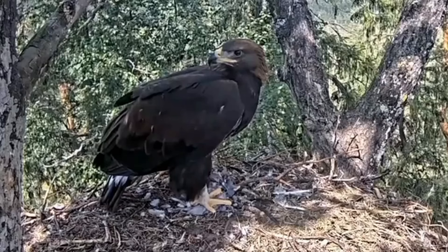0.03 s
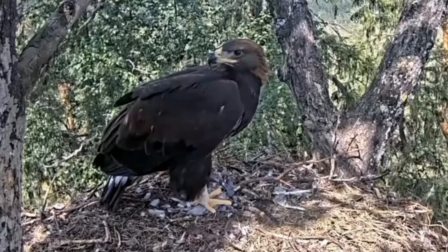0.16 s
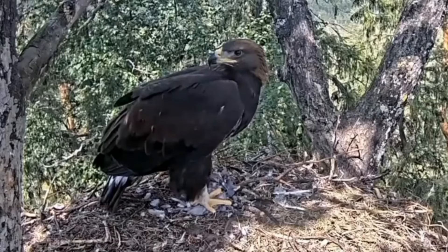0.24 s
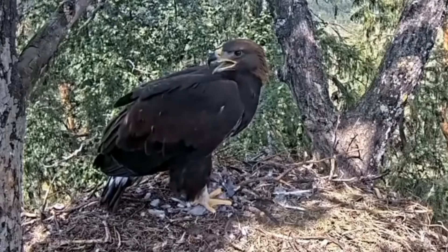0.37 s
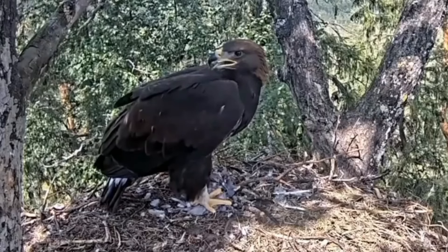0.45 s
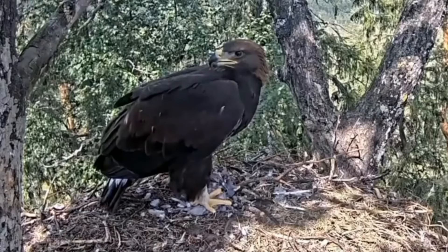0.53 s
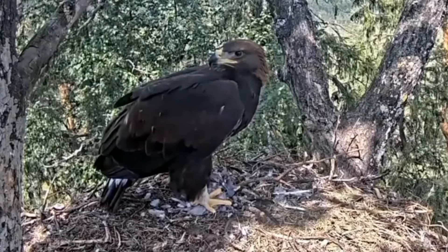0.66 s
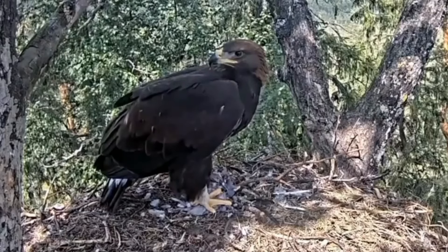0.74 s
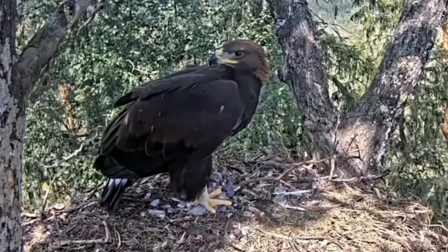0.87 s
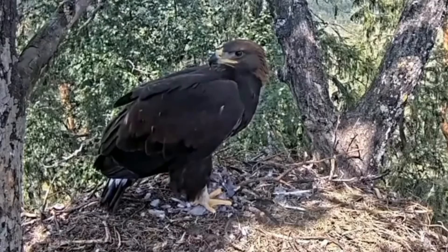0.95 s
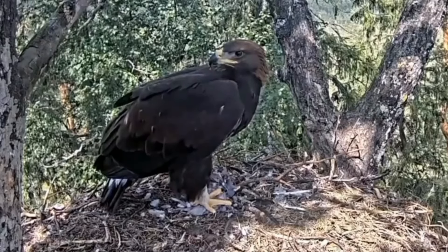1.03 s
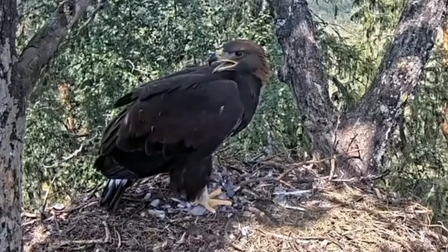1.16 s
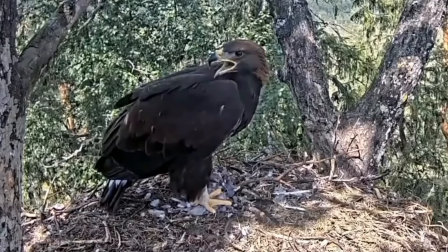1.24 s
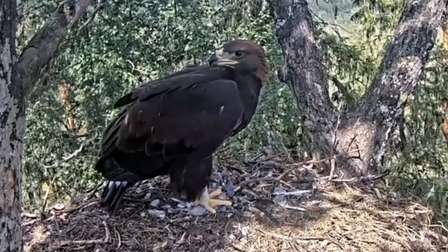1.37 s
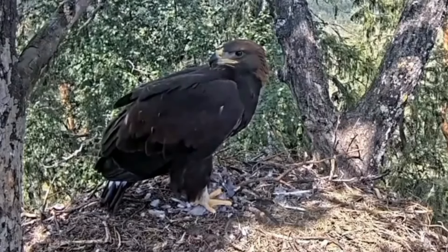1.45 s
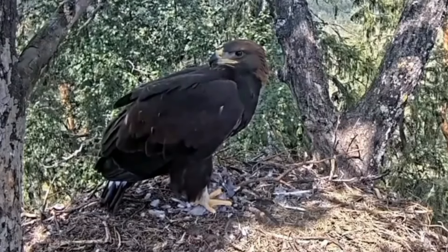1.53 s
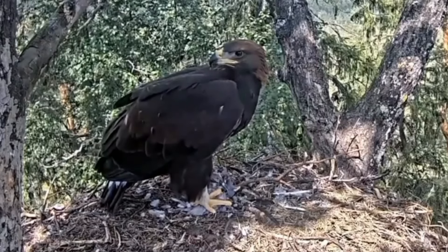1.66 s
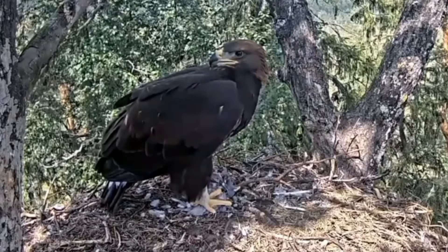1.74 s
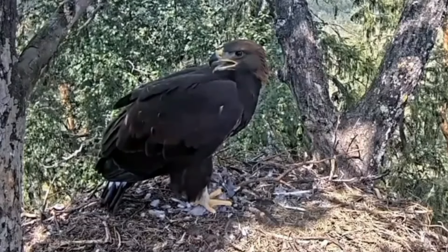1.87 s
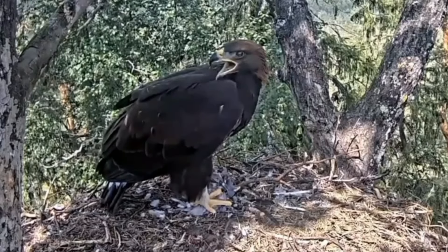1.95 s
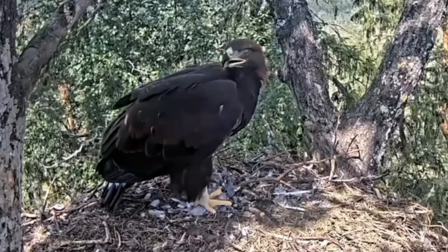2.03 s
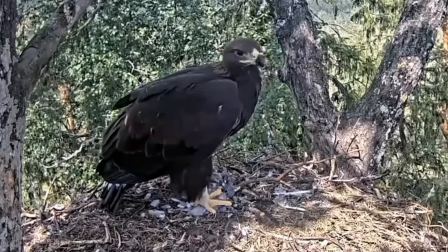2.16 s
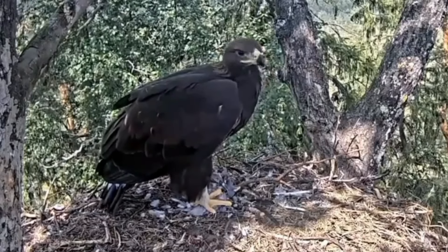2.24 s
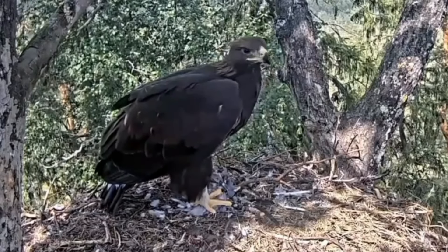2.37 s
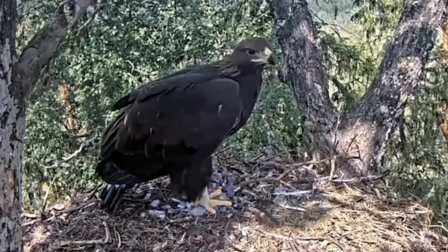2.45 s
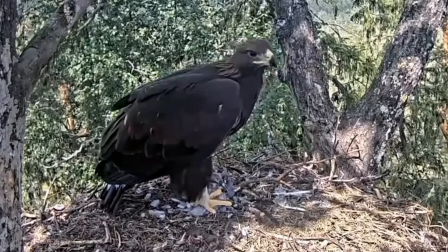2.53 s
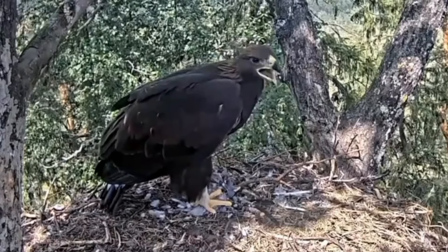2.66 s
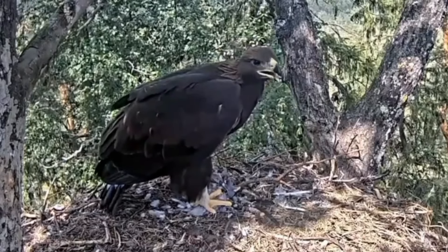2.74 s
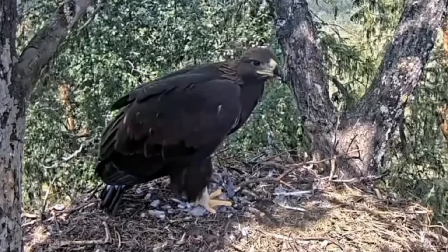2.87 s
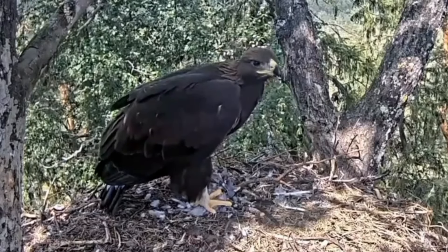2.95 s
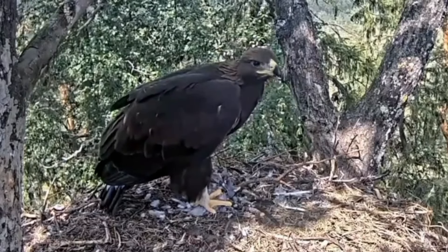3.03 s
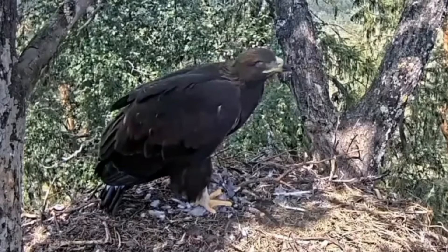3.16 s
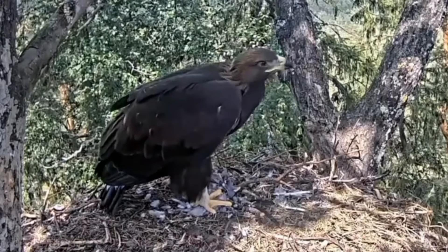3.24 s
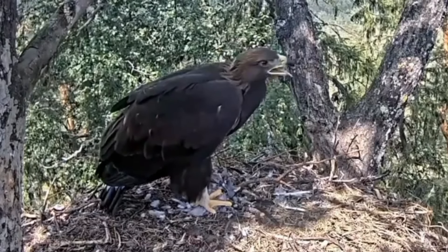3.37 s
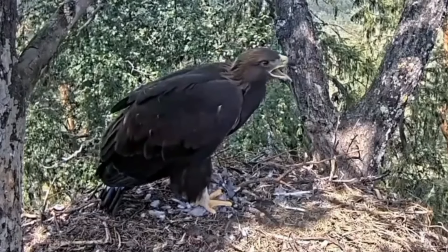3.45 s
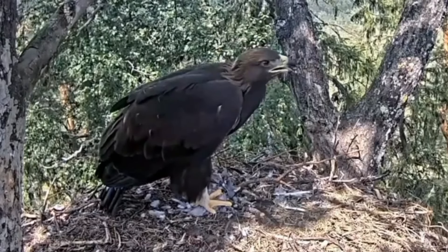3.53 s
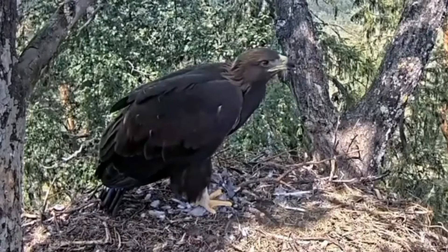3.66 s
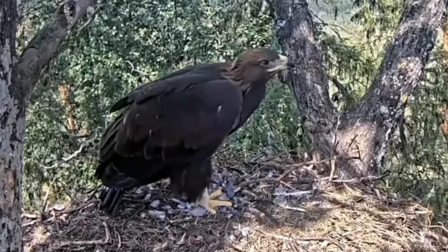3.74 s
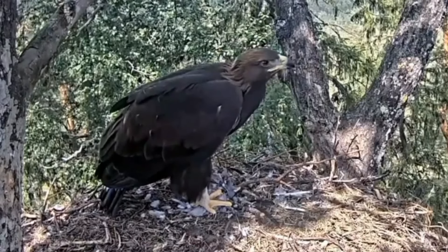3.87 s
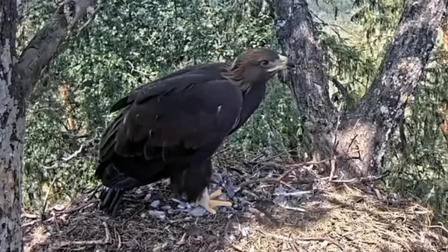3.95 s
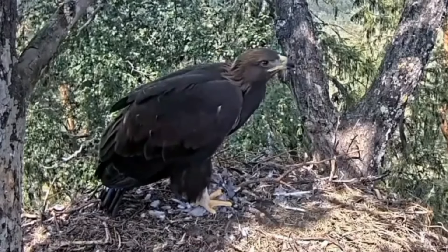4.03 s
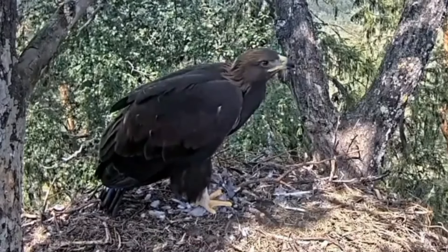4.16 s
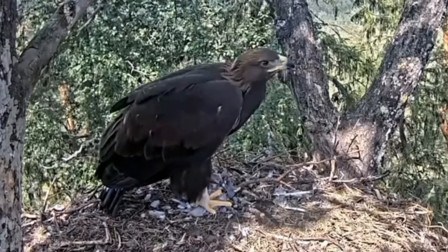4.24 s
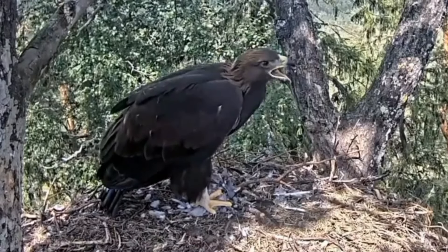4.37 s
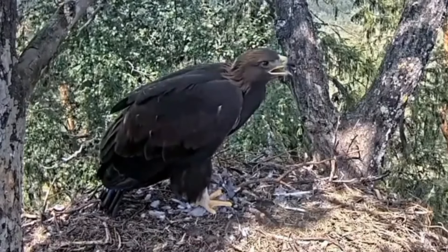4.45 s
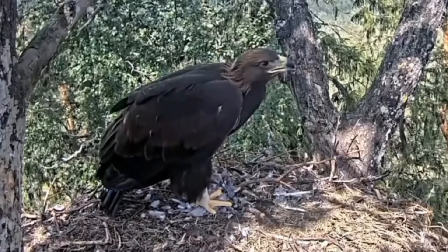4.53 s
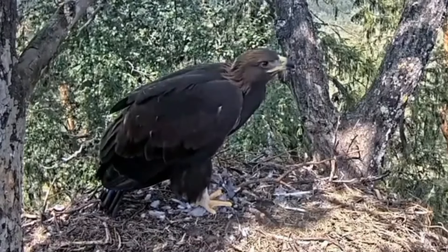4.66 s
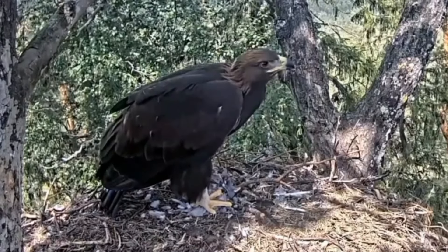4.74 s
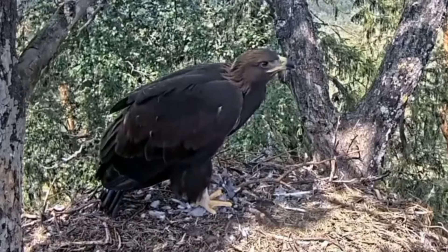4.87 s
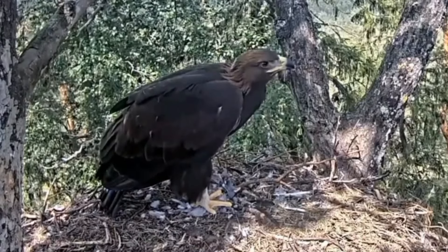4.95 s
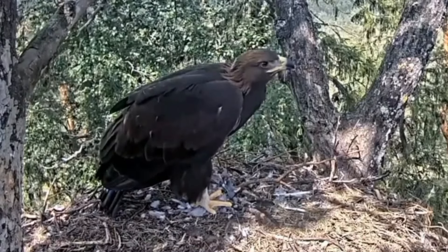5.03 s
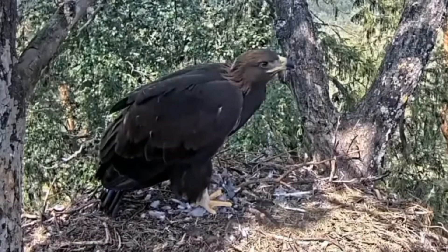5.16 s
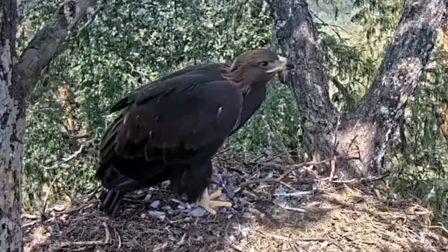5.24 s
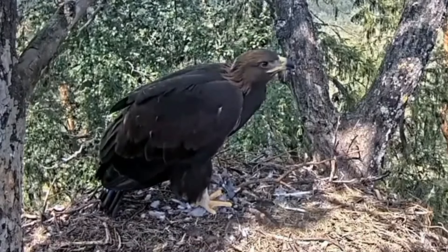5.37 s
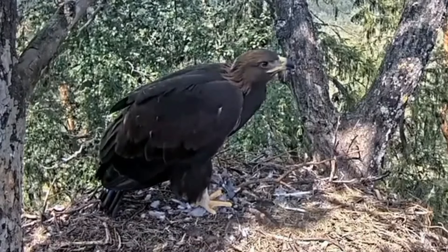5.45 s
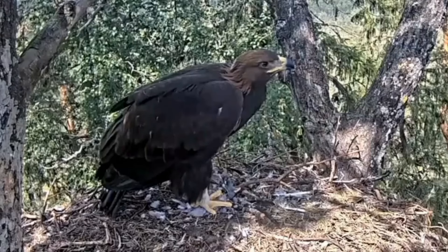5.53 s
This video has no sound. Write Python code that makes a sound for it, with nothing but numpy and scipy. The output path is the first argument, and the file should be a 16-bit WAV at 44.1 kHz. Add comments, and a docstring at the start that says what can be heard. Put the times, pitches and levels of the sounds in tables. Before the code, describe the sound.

In a quiet wood, the fading tail of an earlier call opens the scene, with a faint distant peep. Then five sharp, yelping eagle calls follow at fairly regular gaps, the later ones louder. Each flips from a high clear note to a falling lower one and rings off the trunks. The microphone is fairly near; the background is a very soft hush.

```python
"""Eagle yelping in a wood

A large eagle yelps five times. Each call is a thin rising whistle, a click as the voice catches, a high
clear note and a falling low note from the other side of the syrinx, all built from partials or short chirps.
Sparse decaying echoes stand for the trunks and draw each call into a long tail; a small bird peeps far off.
Under it lies a soft wash of air and leaves, made of shaped noise."""
import sys
import numpy as np
from scipy import signal
from scipy.io import wavfile
from scipy.ndimage import uniform_filter1d

SR = 44100
rng = np.random.default_rng(int(sys.argv[2]) if len(sys.argv) > 2 else 0)


def wrap_up_sound(samples):
    """Save the sound to the file named by the first command line argument, as 16-bit audio."""
    columns = np.atleast_2d(samples).T
    # keep every value between -1 and 1, then stretch to whole-number steps
    tamed = np.clip(columns, -1, 1)
    steps = np.round(tamed * 32767).astype(np.int16)
    wavfile.write(sys.argv[1], SR, steps)


def voltage_ratio(level):
    """Linear amplitude factor for a level in decibels (scalar or array-like)."""
    return 10 ** (np.asarray(level, float) / 20)


N = 246959  # samples, 5.6 s
LEAD = SR  # one second is played ahead so that an earlier tail carries in
STEP_S = .001  # spacing of the points on pitch and level curves


def evened(x):
    """Scales a signal to rms 1."""
    return x / np.sqrt(np.mean(x ** 2) + 1e-20)


def add(mix, s, sound):
    """Mixes a sound in at s seconds, counted from the end of the lead."""
    part = mix[LEAD + round(s * SR):][:len(sound)]
    part += sound[:len(part)]


def wobble(size, hz):
    """Smooth chance of rms 1 that changes about hz times a second."""
    settle = 500  # samples the filter needs to get going
    b, a = signal.butter(3, hz, fs=SR)
    return evened(signal.lfilter(b, a, rng.standard_normal(size + settle))[settle:])


def air():
    """Leaves, far wind, a faint low hum and hiss: random short spectra with faint drifting patches."""
    # colour of the air: f/Hz, relative level per Hz/dB
    colour = [(8, -0.5), (20, -5), (32, -17.5), (75, -20.5), (87, -15.5), (100, -21), (350, -22),
              (900, -30.5), (1400, -31.5), (1520, -42), (3600, -42), (4400, -37.5), (4650, -38),
              (4850, -44.5), (7000, -42), (9500, -47), (15600, -50)]
    level_db, patch_db = -59, 0.59
    frames, hz = N // 1024 + 5, np.fft.rfftfreq(4096, 1 / SR)
    real, imaginary, patches = rng.standard_normal((frames, 2049, 3)).T
    patches = uniform_filter1d(patches, size=50, axis=0)  # broad in frequency
    patches = evened(uniform_filter1d(patches, size=5, axis=1))  # slow in time
    f, db = np.transpose(colour)
    shape_db = np.interp(np.log(hz + 1), np.log(f + 1), db)[:, None]
    spectra = (real + 1j * imaginary) * voltage_ratio(shape_db + patch_db * patches)
    noise = signal.istft(spectra, nperseg=4096, noverlap=3072)[1][:N]
    return voltage_ratio(level_db) * evened(noise)


def note(rows, partials, jitter, flutter_db, breath_db, overtone_db=0, treble_db=0, effort=0):
    """A vibrating membrane: partials on a pitch curve, slightly unsteady, with air noise around each partial."""
    # the throat passes the top partials unevenly, with an upper resonance: f/Hz, gain/dB
    throat = [(5900, 0), (6500, -5), (7300, 0.5), (8200, -1), (8800, -16.5), (9400, -6), (9800, -0.5)]
    s, hz, level_db = np.transpose(rows)
    t = np.arange(s[0], s[-1], 1 / SR)
    pitch = uniform_filter1d(np.interp(t, s, hz), size=90)
    pitch = pitch * (1 + jitter * wobble(len(t), 360))
    angle = 2 * np.pi * np.cumsum(pitch) / SR
    level_db = uniform_filter1d(np.interp(t, s, level_db), size=60)
    level_db = level_db + flutter_db * wobble(len(t), 200)
    # overtones gain or lose on the fundamental as the note swells
    bright_db = overtone_db + effort * (level_db - level_db.max())
    breath = voltage_ratio(breath_db) * wobble(len(t), 1200)
    tone = 0
    for k, db in partials:
        throat_db = np.interp(k * pitch, *np.transpose(throat)) + treble_db * (k > 3)
        # the higher a partial, the more it comes and goes as the beak moves
        fading_db = 1.1 * max(k - 1, 0) * wobble(len(t), 45)
        gain = voltage_ratio(db + bright_db * (k > 1) + throat_db + fading_db) * (1 + k * breath)
        tone = tone + gain * np.cos(k * angle + 2 * np.pi * rng.random())
    return s[0], np.sqrt(2) * voltage_ratio(level_db) * tone * signal.windows.tukey(len(t), .05)


def far_bird():
    """A small bird far off: two gliding peeps, each a single breathy partial."""
    # points along each peep: t/s, f/Hz (sung at 0.99 of it), level/dB
    peeps = [
        [(0, 6750, -84), (.07, 6850, -76), (.12, 6800, -78), (.18, 6950, -81), (.27, 6900, -89)],
        [(4.18, 6580, -86), (4.215, 6730, -78.5), (4.24, 6600, -83.5), (4.265, 6400, -88)],
    ]
    bird = np.zeros(LEAD + N)
    for rows in peeps:
        add(bird, *note(rows, [(0.99, 0.0077)], jitter=.004, flutter_db=-1.5, breath_db=-10.5))
    return bird


def whistle(start, length, start_hz, end_hz, db):
    """Building pressure drives the pitch steadily up; the level swells to a peak and eases off."""
    peak, start_db, end_db = .6, -15.5, -5.5  # peak as a share of the length
    u = np.arange(0, length, STEP_S) / length
    level_db = np.interp(u, [0, peak, 1], [start_db, 0, end_db])
    pitch = end_hz - (end_hz - start_hz) * (1 - u)
    return np.transpose([start + u * length, pitch, db + level_db])


def catch(s, chirp_db, delay, pop_db):
    """A few falling cycles as the whistle shuts off, then a dull pop that rises to pitch as the throat opens."""
    chirp_hz, pop_hz = 4600, 2100  # where the chirp starts, where the pop settles
    t = np.arange(0, .016, 1 / SR)
    chirp_envelope = (t / 0.00128 * np.exp(1 - t / 0.001801)) ** 2
    chirp = np.sin(2 * np.pi * chirp_hz * (t - 12 * t ** 2)) * chirp_envelope
    u = np.maximum(t - delay, 0)
    bent_time = u - .0005 * (1 - np.exp(-u / 0.00016))
    pop_envelope = np.exp(-u / 0.00041) + 0.34 * np.exp(-u / .003)
    pop = -np.sin(2 * np.pi * pop_hz * bent_time) * pop_envelope
    return s, voltage_ratio(chirp_db) * chirp + voltage_ratio(pop_db) * pop


def high_note(start, hz, db, swell_db, sag_hz, takeover):
    """High side of the syrinx: starts sharp and soft, settles, swells, sags as pressure runs out, is cut off."""
    sharp_start, settle_s = .18, .0055  # starts sharp by this share of the pitch
    onset_db, onset_s, cut_db, cut_s = -20.5, .005, -27, 0.0018
    overlap_s = 0.0044  # sounds on past the takeover
    sag_bend, droop_bend, droop_db_per_hz = 2.1, 4.1, 0.0529  # the level droops along with the pitch
    length = takeover + overlap_s - start
    t = np.arange(0, length, STEP_S)
    u = t / length
    pitch = hz * (1 + sharp_start * np.exp(-(t / settle_s) ** 1.5)) - sag_hz * u ** sag_bend
    ends_db = onset_db * np.exp(-t / onset_s) + cut_db * np.exp((t - length) / cut_s)
    droop_db = droop_db_per_hz * sag_hz * u ** droop_bend
    return np.transpose([start + t, pitch, db + ends_db + swell_db * (u - 1) - droop_db])


def rasp(sung):
    """Air rushing past the upper throat resonance: patchy band noise that follows the voice's loudness."""
    centre_hz, half_width_hz, level_db, patch_db = 7377, 650, -47.5, 2.3
    edges = [centre_hz - half_width_hz, centre_hz + half_width_hz]
    band = signal.butter(2, edges, "band", fs=SR, output="sos")
    loudness = np.sqrt(abs(uniform_filter1d(sung ** 2, size=200)))
    noise = evened(signal.sosfilt(band, rng.standard_normal(len(sung))))
    return voltage_ratio(level_db + patch_db * wobble(len(sung), 40)) * loudness * noise


def low_note(high_start, takeover, length, hz, db, murmur_db):
    """Low side of the syrinx: a murmur under the high note, a sudden opening, then falling pitch and level."""
    murmur_delay_s, peak_s, width_s, floor_db = .005, 0.006, 0.0028, -59.5  # a brief flare over a floor
    flat_hz, lift_s = 41.12, .015  # the murmur lies flat and lifts towards the takeover
    drop_hz, drop_s, fall_hz, fall_s = 129, .004, 302.4, 0.041  # a quick drop, then a fall that slows
    leak_db_per_s, knee_db, knee_s = 698.5, -9, 0.0028  # air leaks over ahead of the takeover
    open_db, open_s = -11, .003  # then the voice opens fully
    fade_db, fade_bend, close_db, close_s = -24.5, 1.4, -16, .004
    t = np.arange(high_start + murmur_delay_s - takeover, length, STEP_S)  # 0 at the takeover
    before, after, age = np.minimum(t, 0), np.maximum(t, 0), t - t[0]
    pitch = hz - flat_hz * (1 - np.exp(before / lift_s))
    pitch = pitch - drop_hz * (1 - np.exp(-after / drop_s)) - fall_hz * (1 - np.exp(-after / fall_s))
    flare = voltage_ratio(murmur_db) * np.exp(-((age - peak_s) / width_s) ** 2)
    murmur = flare + voltage_ratio(floor_db) * (t < 0)
    leak_db = leak_db_per_s * before + knee_db * (1 - np.exp(before / knee_s))
    opening_db = open_db * np.exp(-(after / open_s) ** 2)
    ending_db = fade_db * (after / length) ** fade_bend + close_db * np.exp((t - length) / close_s)
    level_db = 20 * np.log10(voltage_ratio(db + leak_db + opening_db + ending_db) + murmur)
    return np.transpose([takeover + t, pitch, level_db])


def eagle():
    """Both sides of the syrinx share one airflow; the first call also sounds ahead of time for its tail."""
    # thin whistles as pressure builds, a lower strand then an upper: t/s, length/s, start f/Hz, end f/Hz, level/dB
    whistle_rows = [(.232, 0.0957, 3550, 4600, -66.5), (0.245, .115, 4795, 6254, -73.5),
                    (.958, .105, 3500, 4794, -65), (1.038, .06, 4950, 5750, -63),
                    (1.705, 0.067, 3916, 4989, -61), (1.754, .063, 5050, 5500, -65),
                    (2.46, .11, 3550, 4905, -60.5), (2.555, .05, 4906, 5440, -62),
                    (3.395, .11, 3520, 4900, -64.5), (3.485, .048, 4900, 5440, -66)]
    # the voice catches: t/s, chirp level/dB (its envelope crests 6 dB above), pop delay/s, pop level/dB
    catch_rows = [(0.367, -40.5, 0.00528, -41.5), (1.1003, -41, 0.00518, -40.5),
                  (1.8185, -40.5, .0045, -34.5), (2.6055, -46.5, .0038, -36), (3.5356, -48, 0.00317, -36)]
    # high side of the syrinx: t/s, held f/Hz, level/dB, swell/dB, sag/Hz
    high_rows = [(.378, 1954, -21, 7, 94.8), (1.112, 1957, -22.5, 4.5, 75.04),
                 (1.8297, 1922, -15, 9.5, 148.4), (2.6176, 1946, -15.5, 10, 86.52),
                 (3.5457, 1955, -16, 9.5, 75)]
    # low side of the syrinx: takeover t/s, length after/s, f/Hz, level/dB, murmur flare level/dB
    low_rows = [(.444, 0.0501, 1426, -25.5, -45), (1.176, 0.052, 1435, -24, -56),
                (1.9, 0.0461, 1411, -19, -41.5), (2.673, 0.0639, 1481, -16.5, -39.5),
                (3.597, 0.0611, 1493, -16, -55)]
    # partials of each voice: multiple of pitch, level/dB
    whistle_partials = [(1, 1.5), (2, -10.5)]
    high_partials = [(.5, -35), (1, 0.5), (2, -20.5), (3, -37), (4, -46), (5, -43), (6, -50)]
    low_partials = [(1, 2.5), (2, -16), (3, -26), (4, -48), (5, -47.5), (6, -47.5), (7, -46)]
    # the head turns between calls: high overtones/dB, low overtones/dB, extra on partials above the third/dB
    head_turns = [(1, 4, -3), (1.5, 4, -7), (-3.5, -1, -1), (-3.5, -3.5, -5), (-4, -4, -3)]
    earlier_s, earlier_db = 0.82, 0.53  # how long ahead the extra call sounds, how loud against the first
    voice, high, low = np.zeros((3, LEAD + N))
    for row in whistle_rows:
        add(voice, *note(whistle(*row), whistle_partials, jitter=.013, flutter_db=4.0, breath_db=-12))
    for row in catch_rows:
        add(voice, *catch(*row))
    for high_row, low_row, (high_db, low_db, top_db) in zip(high_rows, low_rows, head_turns):
        high_curve = high_note(*high_row, low_row[0])
        add(high, *note(high_curve, high_partials, jitter=.002, flutter_db=0.58, breath_db=-34,
                        overtone_db=high_db, treble_db=top_db, effort=-0.45))
        low_curve = low_note(high_row[0], *low_row)
        add(low, *note(low_curve, low_partials, jitter=0.001, flutter_db=0.1164, breath_db=-46.5,
                       overtone_db=low_db, treble_db=top_db, effort=0.1))
    # the shared airflow gives a faint sum tone; changes in flow are what radiates
    sum_tone = voltage_ratio(11.5) * np.gradient(high * low)
    voice += high + low + sum_tone + rasp(high + low)
    add(voice, -earlier_s, voltage_ratio(earlier_db) * voice[LEAD:LEAD + SR // 2].copy())
    return voice


def wood(x):
    """The direct path, then sparse echoes of random sign: near trunks die fast, far ones slowly."""
    # the beak points away, so treble comes mostly by echo:
    # f/Hz, direct level/dB, near trunks level/dB, near t60/s, far trunks level/dB, far t60/s
    paths = [(298.4, -3, -18.5, 0.22, -29.5, 1.6), (1150, -3.5, -15, .3, -30, 1.6),
             (1981.1, 1, -14, 0.465, -28, 2.084), (2730, 0, -1, 0.36, -11.5, 1.1),
             (4218, -1.5, -0.5, 0.38, -10, 1.1), (6020, -12, 1.5, .3, -7, 1.1),
             (10000, -19.5, -9.5, 0.095, -18, .5)]
    build_up_s = 0.0099  # echoes thicken over this time
    taps = np.zeros(3 * SR)
    at = np.arange(200, 3 * SR - 20, 20)  # one echo in every 20 samples
    taps[at + rng.integers(0, 20, len(at))] = rng.choice([-1., 1.], len(at))
    hz, t, z = signal.stft(taps * np.sqrt(20 / SR), SR, nperseg=128)
    f, *columns = np.transpose(paths)
    curves = [np.interp(np.log(hz + 1), np.log(f), c)[:, None] for c in columns]
    direct_db, near_db, near_t60, far_db, far_t60 = curves
    # before the build-up, each decay is scaled so that its dB value is its whole energy
    power = 0
    for db, t60 in [(near_db, near_t60), (far_db, far_t60)]:
        power = power + voltage_ratio(2 * (db - 60 * t / t60)) * 2 * np.log(1000) / t60
    build_up = 1 - np.exp(-t / build_up_s)
    tail = signal.istft(z * np.sqrt(power) * build_up, SR, nperseg=128)[1]
    direct = signal.oaconvolve(x, signal.firwin2(127, hz, voltage_ratio(direct_db[:, 0]), fs=SR), "same")
    return direct + signal.fftconvolve(x, tail)[:len(x)]


def trunks(x):
    """Bark and leaves close by throw the treble back as a few separate echoes."""
    # single echoes off the nearest trunks: delay/s, level/dB
    echoes = [(0.014, -7.5), (.026, -9), (.045, -8)]
    treble = signal.sosfilt(signal.butter(4, 3100, "high", fs=SR, output="sos"), x)
    out = np.zeros(len(x) + SR)
    for delay, db in echoes:
        add(out, delay - 1, voltage_ratio(db) * treble)  # x begins one second ahead, with the lead
    return out[:len(x)]


def scene():
    """The birds heard through the wood, and the air."""
    birds = eagle() + far_bird()
    heard = wood(birds) + trunks(birds)
    return (heard[LEAD:] + air())[None]


def low_pass(x):
    """Removes everything above the highest recorded frequency."""
    return signal.sosfilt(signal.butter(12, 15670, fs=SR, output="sos"), x)


def record(dry):
    """Takes the finished mix to its final form."""
    return low_pass(dry)


dry = scene()
out = record(dry)
wrap_up_sound(out)
```